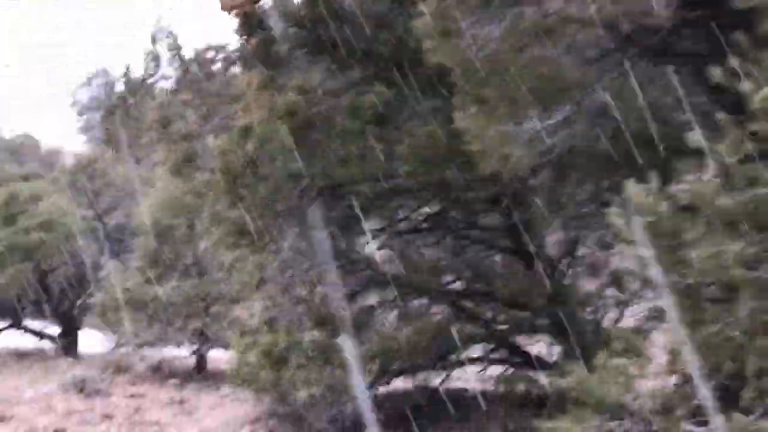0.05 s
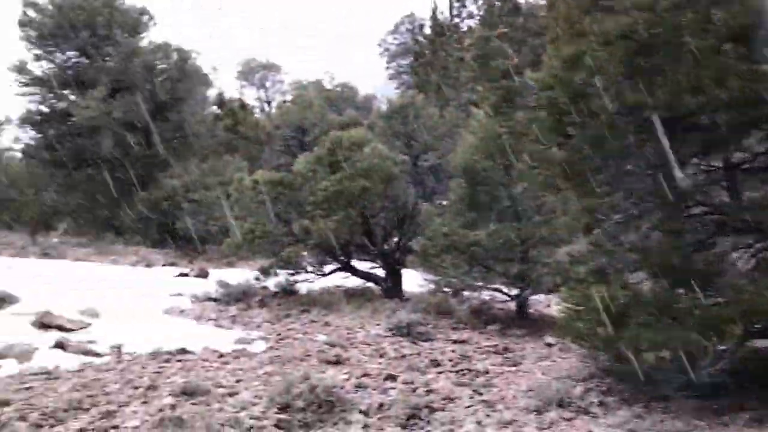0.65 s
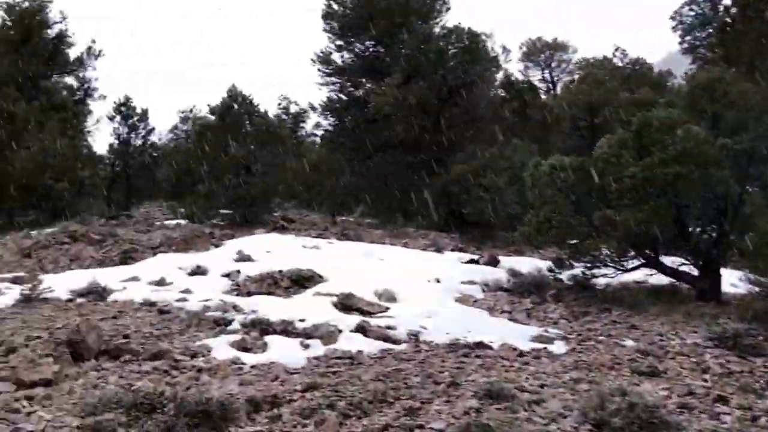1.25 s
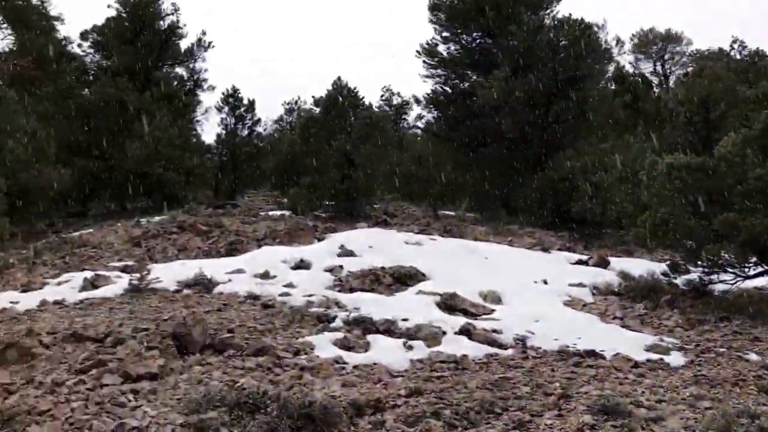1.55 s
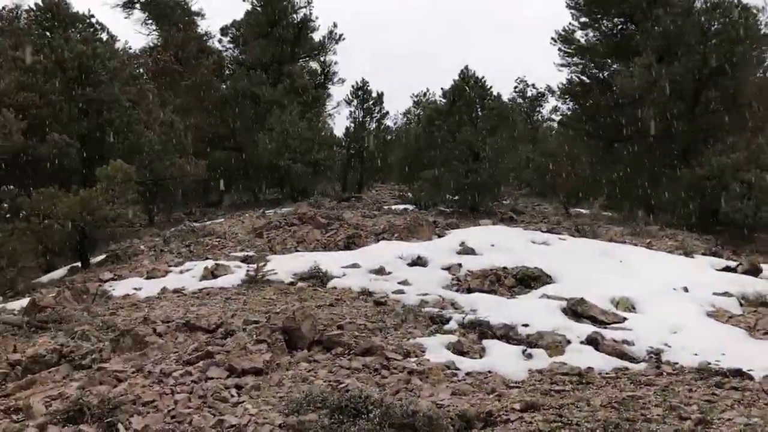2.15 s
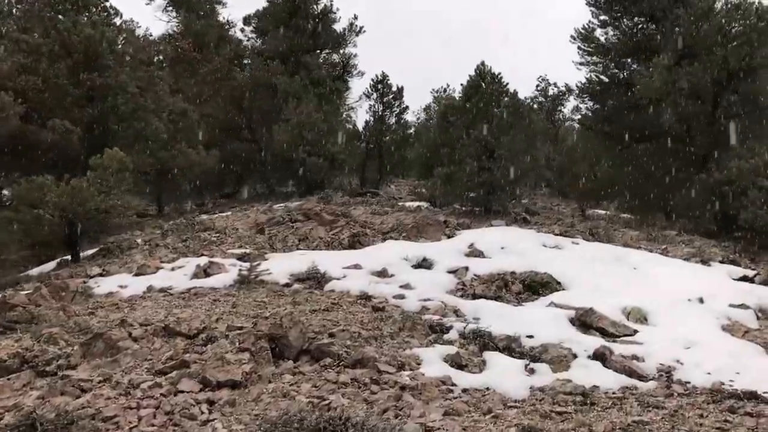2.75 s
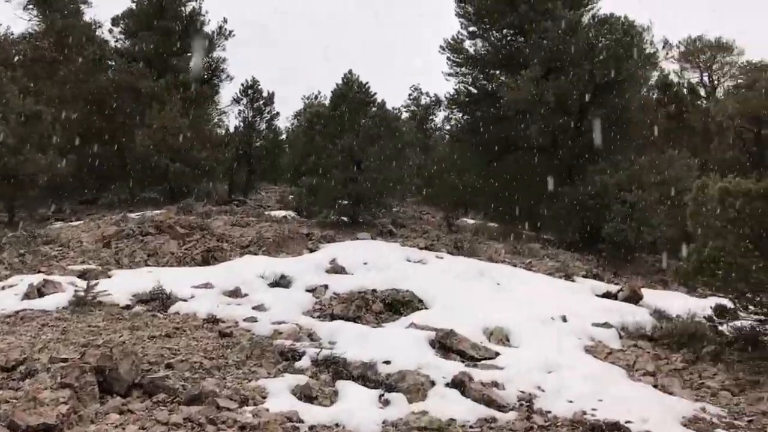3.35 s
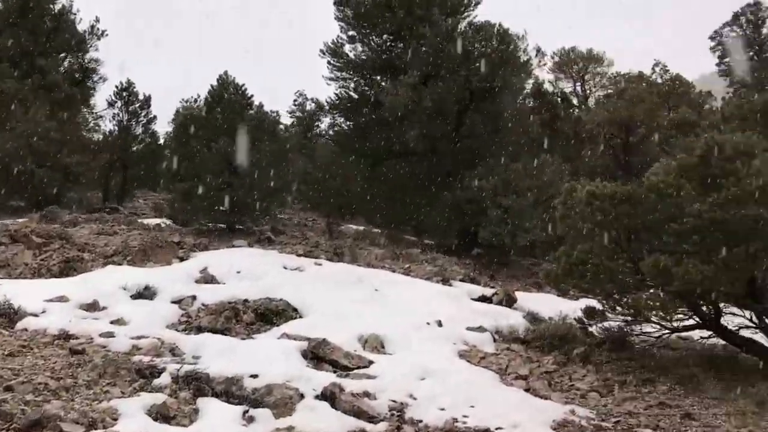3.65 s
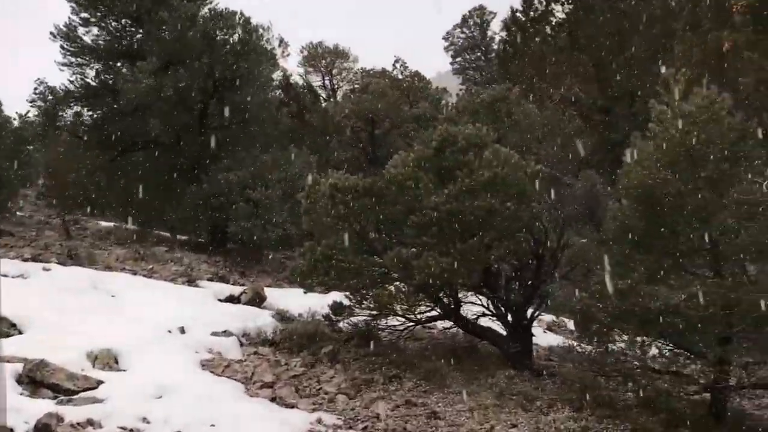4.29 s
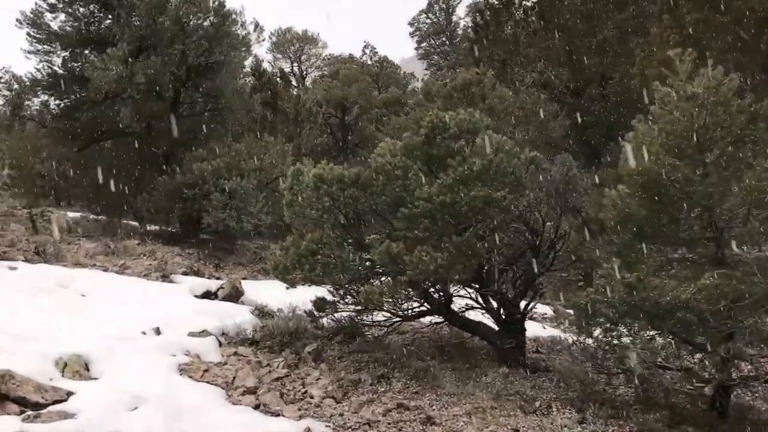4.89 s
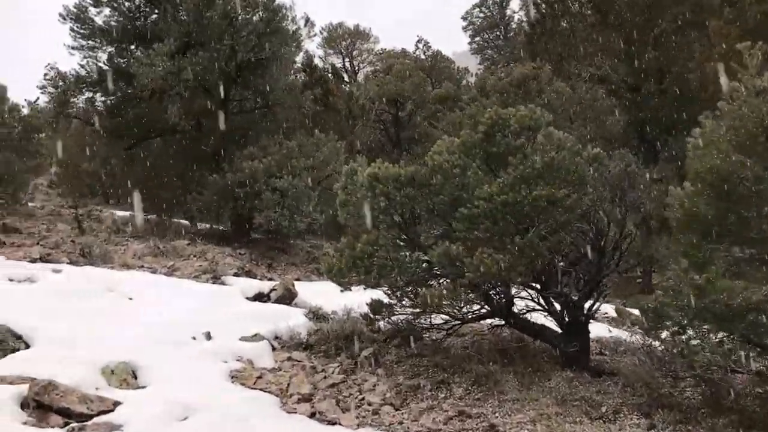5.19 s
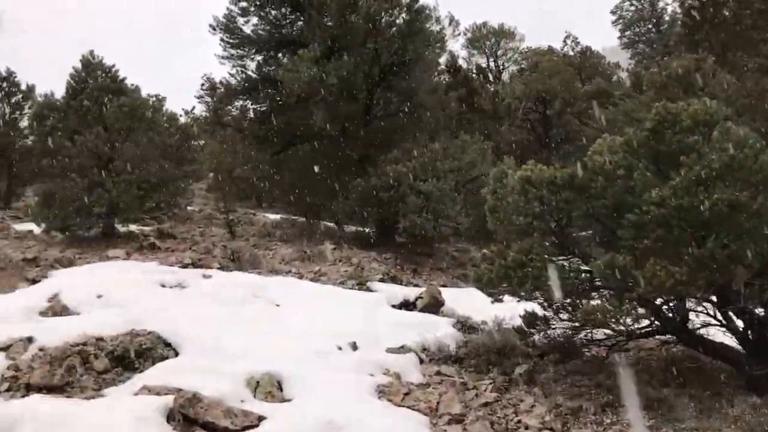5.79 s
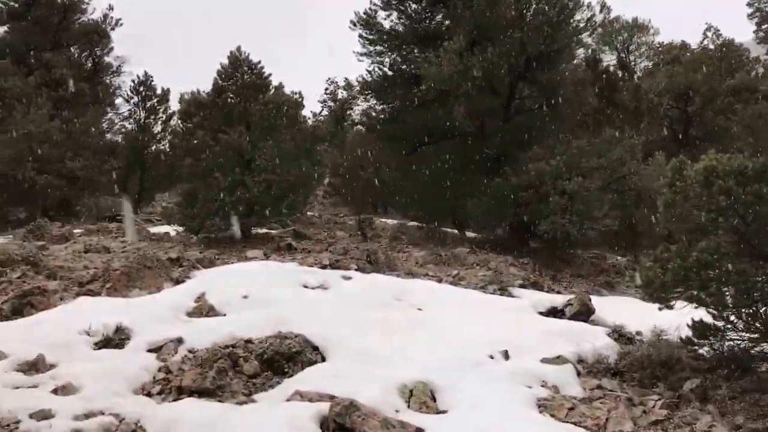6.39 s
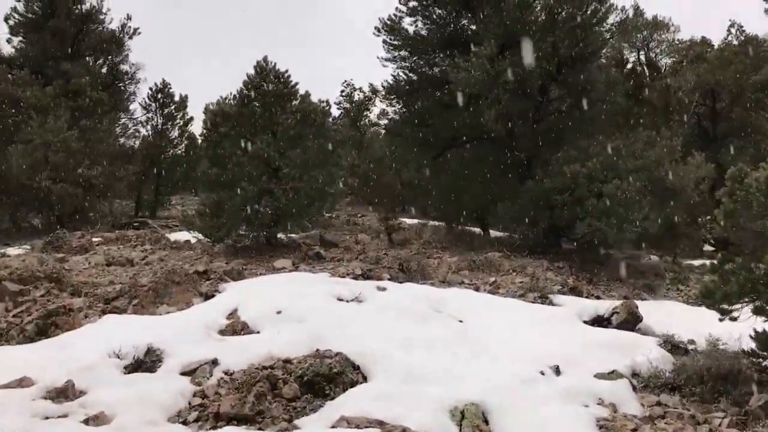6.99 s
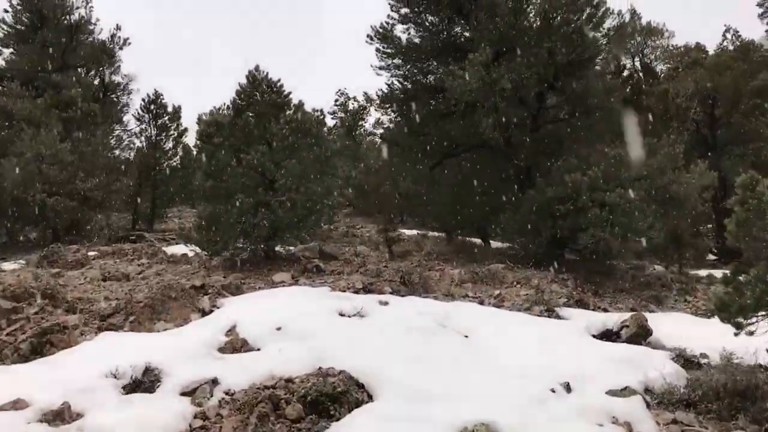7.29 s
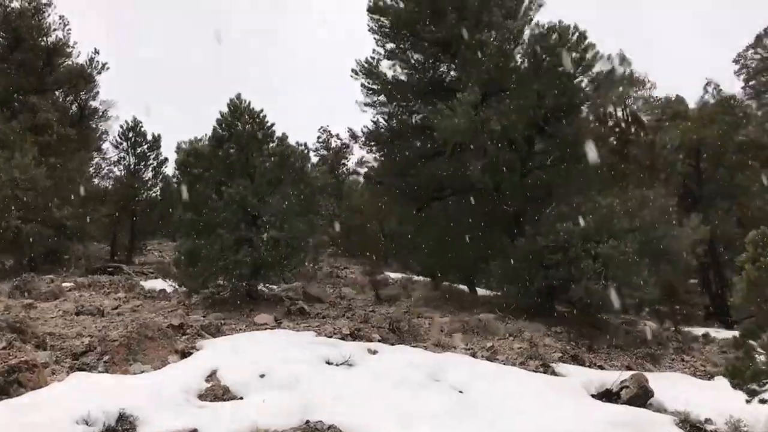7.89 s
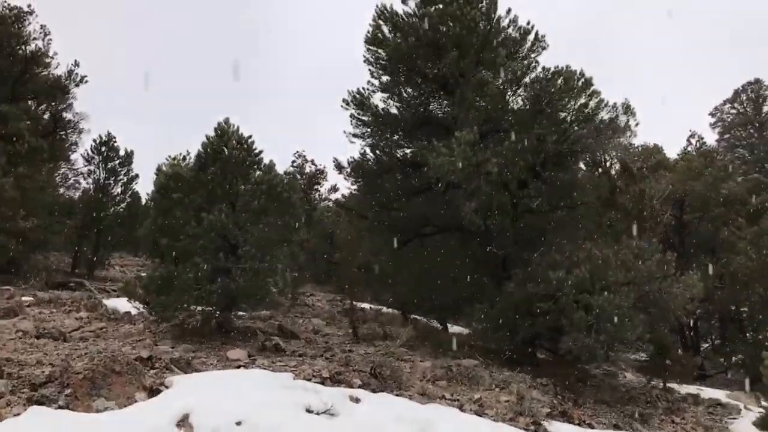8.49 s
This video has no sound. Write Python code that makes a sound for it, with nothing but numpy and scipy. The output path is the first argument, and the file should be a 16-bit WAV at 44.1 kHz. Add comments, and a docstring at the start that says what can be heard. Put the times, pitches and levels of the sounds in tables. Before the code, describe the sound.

A fine, even hiss and patter of sleet fills an open spot among trees, with nearer pellets ticking on stones. A dull footfall comes at the start, then scattered gritty steps and slight hand bumps as someone turns on the spot. From about halfway, a few ice pellets snap loudly against the hand-held camera, right beside the microphone. A light breeze rushes faintly throughout.

```python
"""Stony ground with old snow and pines, in sleet and a light breeze, heard from a hand-held camera.
Countless far pellets merge into a hiss; nearer ones tick, each briefly ringing what it lands on.
Below the microphone the person holding it turns on the spot: soft thuds, shifting grit and stones.
Closest of all, four pellets strike the camera case and set it ringing, three with a rebound."""
import sys
import numpy as np
from scipy import signal
from scipy.fft import rfft
from scipy.io import wavfile
from scipy.ndimage import uniform_filter1d

SR = 44100
rng = np.random.default_rng(int(sys.argv[2]) if len(sys.argv) > 2 else 0)


def materialize(psi):
    """Save the field psi as 16-bit PCM at rate SR to the path in sys.argv[1].

    A 1-D psi becomes a single channel; in a 2-D psi each row is a channel.
    """
    bounded = np.clip(np.atleast_2d(psi).T, -1, 1)
    quanta = np.round(bounded * 32767).astype(np.int16)
    wavfile.write(sys.argv[1], SR, quanta)


N = 376613
TIME = np.arange(N) / SR


def undb(db):
    """Decibels to gain."""
    return 10 ** (np.asarray(db) / 20)


def unit(x):
    """Scale to rms 1."""
    return x / np.sqrt(np.mean(x ** 2))


def burst(x):
    """Give a short sound the energy of four milliseconds at rms 1."""
    return x / np.sqrt(np.sum(x ** 2) / (.004 * SR))


def add(out, start_s, x):
    """Mix a short sound in at start_s."""
    i = max(int(start_s * SR), 0)
    out[i:i + len(x)] += x[:max(len(out) - i, 0)]


def ring(x, hz, width_hz):
    """One resonance, gain 1 at its centre."""
    q = max(hz / width_hz, .6)
    return signal.lfilter(*signal.iirpeak(min(hz, .45 * SR), q, fs=SR), x)


def damped(x, hz, width_hz):
    """A damped resonance with steep skirts: the soft contact limits the band once more."""
    return ring(ring(x, hz, width_hz), hz, 2 * width_hz)


def cushion(x, hz):
    """Soft things such as soil and soles pass only the lows."""
    return signal.sosfilt(signal.butter(3, hz, fs=SR, output="sos"), x)


def low_pass(x, hz):
    """Cut everything above hz steeply."""
    return signal.sosfilt(signal.ellip(8, .2, 70, hz, fs=SR, output="sos"), x)


def colour(x, points):
    """Shape a sound with a smooth curve through (freq_hz, gain_db) points, at rms 1."""
    hz, db = np.transpose(points)
    bins_hz = np.maximum(np.fft.rfftfreq(N, 1 / SR), 1)
    gain = undb(np.interp(np.log(bins_hz), np.log(hz), db))
    return unit(np.fft.irfft(rfft(x) * gain, N))


def flutter(rate_hz):
    """Random levels, each held 1 / rate_hz seconds, smoothed twice; rms 1."""
    hold = int(SR / rate_hz)
    levels = np.repeat(rng.standard_normal(N // hold + 1), hold)
    return unit(uniform_filter1d(uniform_filter1d(levels, hold), hold)[:N])


def impacts(per_s, spread_db, range_db):
    """Random impulses, many weak and few strong, up to range_db above the weakest."""
    size_db = (spread_db * rng.exponential(size=N)) % range_db
    lands = rng.random(N) < per_s / SR
    return lands * rng.choice([-1, 1], N) * undb(size_db)


def contact(decay_s, crumble):
    """A sharp push followed by a moment of crumbling."""
    t = TIME[:SR // 10]
    push = crumble * rng.standard_normal(len(t)) * np.exp(-t / decay_s)
    push[0] += 1
    return push


def strikes(rows, decay_s, crumble):
    """Each contact excites one quickly damped resonance of whatever is struck."""
    out = np.zeros(N)
    for start_s, level_db, pitch_hz, width_hz in rows:
        knock = damped(contact(decay_s, crumble), pitch_hz, width_hz)
        add(out, start_s, undb(level_db) * burst(knock))
    return out


# Open air all around the microphone: freq_hz, gain_db
BREEZE_SPECTRUM = [(20, -4), (45, 1.5), (90, -5), (170, 2.5), (340, -0.5), (480, -6), (750, -7), (1200, -4),
                   (1800, -8.5), (2600, -19)]
def breeze():
    """Low rush of a light breeze, fluttering a little."""
    return undb(-57) * colour(rng.standard_normal(N), BREEZE_SPECTRUM) * undb(flutter(30))


# Sleet far off, over the ground and the pines: freq_hz, gain_db
HISS_SPECTRUM = [(880, -13), (1500, -4.5), (2080, -1.5), (4480, 2), (4890, -2), (5670, 2), (6770, 1.5),
                 (7700, -1.5), (9100, 2.5), (10300, -3.5), (11200, 1.5), (14700, 3), (15450, 5),
                 (16000, -52)]
def far_sleet():
    """Thousands of tiny impacts a second over the smooth hiss of the distant trees."""
    patter = unit(impacts(per_s=4500, spread_db=5.5, range_db=19))
    hiss = colour(rng.standard_normal(N) + undb(1.5) * patter, HISS_SPECTRUM)
    return hiss * undb(1.16 * flutter(60))


# Surfaces nearer the microphone: pitch_hz, width_hz, pellets_per_s, range_db, relative_db
NEAR_SURFACES = [(1000, 1000, 55, 11.5, -20), (2200, 1100, 55, 12.5, -19.5), (4200, 1500, 70, 12, -17.5),
                 (8000, 3500, 75, 13, -16.5), (13000, 7000, 110, 14.5, -9.3)]
def near_sleet():
    """Single pellets, each at its own pitch: dull on earth and twigs, brighter on stone, finest on ice."""
    out, t = np.zeros(N), TIME[:SR // 100]
    spread_octaves = .43  # either way: no two stones or twigs ring alike
    for pitch_hz, width_hz, pellets_per_s, range_db, relative_db in NEAR_SURFACES:
        pellets = np.zeros(N)
        for when, size, pitch, damping in rng.random((int(pellets_per_s * N / SR), 4)):
            ring_hz = pitch_hz * 2 ** (spread_octaves * (2 * pitch - 1))
            fade = np.pi * width_hz * (.5 + damping) * t
            size_db = (-6.5 * np.log(1 - size)) % range_db  # many small, few large
            tick = fade * np.exp(-fade) * np.sin(2 * np.pi * ring_hz * t)
            add(pellets, when * N / SR, undb(size_db) * tick)
        out += undb(relative_db) * unit(pellets)
    return out


# Strength of the sleet over the whole place: time_s, relative_db
SHOWER_STRENGTH = [(0.0, -49.5), (2.0, -48.5), (3.5, -48.5), (5.3, -48), (6.7, -50), (7.5, -49),
                   (8.54, -50)]
def shower():
    """Far and near pellets swell and ease together."""
    strength = undb(np.interp(TIME, *np.transpose(SHOWER_STRENGTH)))
    return strength * (undb(.86) * far_sleet() + undb(4) * near_sleet())


# Brief dips in the background at the microphone: centre_s, depth_db, length_s
BACKGROUND_DIPS = [(0.055, 7, .026), (0.226, 10, .022), (1.297, 5, .022), (1.868, 8, .024),
                   (1.955, 8, .024), (1.998, 8, .018), (2.478, 21, .03), (2.606, 29, .028),
                   (2.702, 4, .016), (3.17, 8, .02), (3.359, 14, .015), (3.64, 7, .025), (3.98, 11, .026),
                   (5.155, 7, .024), (6.179, 11, .025), (7.992, 8, .026)]
def dips():
    """Gain of shower and breeze: it drops abruptly for a moment and comes straight back."""
    drop_db = sum(depth_db * np.exp(-np.abs(2 * (TIME - centre_s) / length_s) ** 3)
                  for centre_s, depth_db, length_s in BACKGROUND_DIPS)
    return undb(-drop_db)


# Pellets landing close to the microphone: start_s, relative_db, pitch_hz, width_hz
CLOSE_PELLETS = [(0.6344, -45, 12900, 4000), (1.1980, -44.5, 3230, 450), (1.1985, -48, 8860, 4000),
                 (1.8125, -45, 5750, 1000), (1.8127, -46, 10600, 6000), (1.8129, -49, 3200, 900),
                 (1.8400, -44.5, 12300, 5000), (2.2821, -34, 8140, 1720), (2.6665, -54, 8000, 4000),
                 (2.9805, -46, 13200, 5000), (3.0268, -45, 12500, 4000), (3.3431, -46, 13500, 3000),
                 (3.5605, -46, 12300, 4500), (3.8531, -44, 4030, 450), (4.0411, -47, 8900, 2600),
                 (4.0941, -36.5, 7940, 1600), (4.2015, -43.5, 12950, 3000), (4.5831, -42, 13100, 4000),
                 (4.5842, -47.5, 3990, 1000), (4.5927, -42, 10400, 4000), (4.9177, -47, 14000, 4000),
                 (5.0752, -45, 7600, 5000), (5.2191, -45, 9240, 600), (5.9744, -44.5, 4120, 600),
                 (6.0298, -45.5, 4230, 550), (6.2342, -46.5, 3400, 600)]
def close_ticks():
    """Hard, very short contacts that stand out of the shower as bright ticks."""
    return undb(6) * strikes(CLOSE_PELLETS, decay_s=.0005, crumble=.12)


# The loudest knocks and pats on the stony ground nearby: start_s, level_db, pitch_hz, width_hz
GROUND_KNOCKS = [(0.2567, -38, 1280, 250), (0.3390, -47, 1170, 450), (0.7185, -45, 1090, 500),
                 (1.1374, -42, 1800, 600), (1.146, -43, 1180, 600), (1.179, -40, 950, 450),
                 (1.326, -45, 1030, 500), (1.675, -48, 1020, 600), (1.8347, -41.5, 1380, 800),
                 (2.0551, -38, 920, 400), (2.0853, -40, 880, 600), (2.1177, -42, 960, 300),
                 (2.857, -44.5, 840, 400), (2.891, -41, 1360, 700), (2.946, -45, 1090, 450),
                 (3.212, -47, 1180, 450), (3.2532, -41, 2140, 170), (3.386, -47, 1000, 500),
                 (3.783, -44, 426, 260), (3.8527, -36, 895, 200), (3.869, -42, 670, 300),
                 (4.0409, -39.5, 1540, 1500), (4.1934, -42.5, 1160, 150), (4.5835, -45.5, 1800, 600),
                 (4.9201, -44, 845, 550), (5.3365, -41.5, 1250, 800), (5.3398, -45, 1150, 700),
                 (5.3853, -33.5, 1200, 617), (5.4112, -39, 980, 580), (5.446, -47.5, 980, 450),
                 (5.544, -48, 1290, 810), (5.9744, -49.5, 955, 600), (6.049, -44, 620, 450),
                 (6.1131, -48, 1430, 800), (6.2345, -45, 645, 400), (6.3135, -47.5, 840, 600),
                 (6.821, -47.5, 950, 450), (6.8902, -43, 1430, 500), (6.9382, -41.5, 1120, 480),
                 (7.0405, -44.5, 1740, 600), (7.335, -47, 1520, 700), (8.024, -46, 2210, 900),
                 (8.098, -49, 1120, 350), (8.1185, -47.5, 2350, 600), (8.148, -46, 450, 300),
                 (8.2515, -50, 1050, 500), (8.2974, -39, 1630, 850), (8.389, -52, 1450, 700),
                 (8.4208, -42.5, 1150, 600)]
def stone_knocks():
    """Struck stony ground rings briefly, lower and with a longer crumble than the ticks."""
    return strikes(GROUND_KNOCKS, decay_s=.0035, crumble=.075)


# The hand working the camera, right at the microphone: time_s, level_db
GRIP_EFFORT = [(0, -70), (1.2, -60), (2.0, -65.5), (3.6, -61), (5.6, -61.5), (6.9, -65), (7.7, -66),
               (8.5, -57)]
def hand_stir():
    """Tiny jolts of the grip make a faint rumble, stronger while the camera turns."""
    effort = undb(np.interp(TIME, *np.transpose(GRIP_EFFORT)))
    jolts = impacts(per_s=30, spread_db=5, range_db=12)
    return effort * unit(damped(jolts, hz=66, width_hz=130))


# The camera bumped in the hand: start_s, level_db, pitch_hz
GRIP_BUMPS = [(0.316, -39.5, 169), (0.558, -45, 75), (1.375, -46, 168), (1.824, -45, 135),
              (2.422, -48.5, 184.4), (3.419, -45, 90), (3.491, -45, 145), (3.73, -43, 67), (3.81, -41, 55),
              (3.937, -44, 122), (4.257, -47, 104), (4.388, -46, 97), (5.444, -43, 123), (5.522, -44, 143),
              (5.615, -45, 70), (6.494, -45, 220), (8.292, -42.5, 122)]
def hand_bumps():
    """Each soft bump rings one low, broad resonance of the hand-held camera."""
    bumps = [(start_s, level_db, hz, hz / 1.75) for start_s, level_db, hz in GRIP_BUMPS]
    return strikes(bumps, decay_s=.0072, crumble=.021)


def sole_pressure(start_s, roll_s, attack_s=.0056):
    """A sole meets the grit just ahead of the heel's knock, then lets go as the foot rolls."""
    t = TIME - start_s
    return np.exp(-np.where(t < 0, t / attack_s, t / roll_s) ** 2)


def soil():
    """Soil under load gives way in small, dull jolts."""
    jolts = impacts(per_s=300, spread_db=3, range_db=13)
    return undb(-3.5) * unit(damped(jolts, hz=233, width_hz=350))


# Grit on the ground below the microphone: freq_hz, gain_db
GRIT_SPECTRUM = [(60, -6), (200, 3.5), (500, -1.5), (1000, -3.5), (2000, -8.5), (3000, -8), (4500, -22),
                 (12000, -43)]
def scuffing():
    """Grit crunches in separate grains and pebbles knock as they roll under a sole."""
    grit = colour(impacts(per_s=1000, spread_db=3.5, range_db=16), GRIT_SPECTRUM)
    knocks = impacts(per_s=120, spread_db=5.5, range_db=7)
    pebbles = unit(damped(knocks, hz=1060, width_hz=850))
    return grit + undb(-4) * pebbles


# Feet set down or twisted below the microphone: start_s, heel_db, heel_hz, weight_db, grit_db, roll_s
FOOTFALLS = [(0.3403, -24, 160, -32, -55, 0.016), (0.532, -46, 200, -59, -59, 0.031),
             (1.053, -39, 110, -42, -55, 0.014), (1.13, -49, 300, -50, -54, 0.063),
             (1.439, -43, 120, -50, -64, 0.022), (2.046, -42, 312, -39.5, -57, 0.31),
             (2.934, -41, 257, -49, -50.5, 0.046), (3.785, -44, 327, -49, -49, 0.044),
             (3.854, -37, 300, -41, -50.5, 0.097), (4.482, -42, 258, -54, -57.5, 0.21),
             (4.508, -34.5, 246, -45, -69, .04), (4.89, -56, 150, -45, -70, 0.054),
             (5.273, -31, 186, -37, -44.5, 0.031), (5.293, -39, 227, -49, -59, .02),
             (5.308, -34, 225, -38, -52.5, 0.17), (6.034, -31, 216, -39, -52.5, 0.022),
             (6.233, -43, 405, -64, -55, 0.0069), (6.364, -41, 261, -48, -56, 0.073),
             (7.310, -39, 230, -46, -51, 0.054), (8.084, -45, 330, -58, -56, 0.018),
             (8.0988, -32.5, 266, -30.5, -58, 0.11), (8.403, -46, 250, -45, -61, 0.027)]
def footsteps():
    """The heel knocks, the body's weight follows with a deeper thump, the sole works soil and grit."""
    heels, weights, pressure = np.zeros((3, N))
    weight_lag_s, weight_hz, weight_width_hz = .00463, 71, 64
    for start_s, heel_db, heel_hz, weight_db, grit_db, roll_s in FOOTFALLS:
        knock = strikes([(start_s, heel_db, heel_hz, heel_hz / 1.2)], decay_s=.011, crumble=.045)
        heels += cushion(knock, hz=1.82 * heel_hz)  # the sole mutes the top of the knock
        thump = (start_s + weight_lag_s, weight_db, weight_hz, weight_width_hz)
        weights += strikes([thump], decay_s=.011, crumble=.011)
        pressure += undb(grit_db) * sole_pressure(start_s, roll_s)
    return heels + cushion(weights + pressure * soil(), hz=590) + pressure * scuffing()


# Resonances of the case around the microphone: pitch_hz, width_hz, gain_db
SHELL_MODES = [(79, 89, 1.5), (280, 170, -4.5), (600, 220, 1), (1220, 1150, -2), (2100, 160, -2),
               (2950, 240, -26), (4220, 510, 1.5), (6380, 1220, 5.5), (9200, 1900, -1.5), (12400, 2600, 8),
               (14700, 2300, 10)]
def case_crack(push, hollow_db):
    """Hard ice excites every mode; hollow_db weights the low ones, which give the hollow knock."""
    return sum(undb(gain_db + hollow_db * (hz < 900)) * ring(push, hz, width_hz)
               for hz, width_hz, gain_db in SHELL_MODES)


# Resonances of the case's rim: pitch_hz, width_hz, gain_db
PING_MODES = [(3330, 250, -1.5), (5280, 270, 2)]
def rim_ping(push):
    """The rim's two narrow modes ring on as a ping."""
    return sum(undb(gain_db) * ring(push, hz, width_hz) for hz, width_hz, gain_db in PING_MODES)


# Pellets and their rebounds on the case, right beside the microphone:
# start_s, crack_db, sharpness_hz, panel_db, panel_hz, hollow_db, ping_db
CASE_PELLETS = [(4.0941, -30.5, 5000, -24.5, 3150, -2, -36), (5.5150, -20, 14300, -33, 3200, 0.5, -30.5),
                (5.5170, -34.5, 4000, -36, 2800, 2, -36), (6.5489, -19, 13800, -28.5, 2940, 2.5, -32),
                (6.5545, -25, 6000, -43, 3380, -8, -40), (7.0788, -26, 2000, -20.5, 3030, -3.5, -39),
                (7.0805, -30.5, 4000, -52, 2800, 1.5, -34)]
def case_hits():
    """Each pellet cracks on the case: mid-panel hits snap, hits near the rim ping."""
    out, panel_width_hz = np.zeros(N), 1900
    for start_s, crack_db, sharpness_hz, panel_db, panel_hz, hollow_db, ping_db in CASE_PELLETS:
        softening = signal.butter(1, sharpness_hz, fs=SR)
        push = signal.lfilter(*softening, contact(decay_s=.0012, crumble=.02))
        panel = ring(ring(push, panel_hz, panel_width_hz), panel_hz, panel_width_hz)
        add(out, start_s, undb(crack_db) * burst(case_crack(push, hollow_db)))
        add(out, start_s, undb(panel_db) * burst(panel))
        add(out, start_s, undb(ping_db) * burst(rim_ping(push)))
    return out


def scene():
    """Breeze and shower at the back; ground, hand, feet and case in front, in mono."""
    background = (breeze() + shower()) * dips()
    outdoors = low_pass(background + close_ticks(), hz=15700)
    handling = cushion(hand_stir() + hand_bumps(), hz=420)
    return (outdoors + stone_knocks() + handling + footsteps() + case_hits())[None]


def record(dry):
    """The camera's microphone loses the deepest bass and the very top."""
    bass_cut = signal.butter(2, 39, "high", fs=SR, output="sos")
    return low_pass(signal.sosfilt(bass_cut, dry), hz=16400)


dry = scene()
out = record(dry)
materialize(out)
```